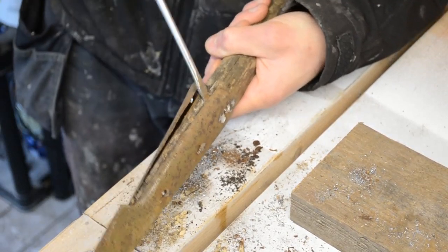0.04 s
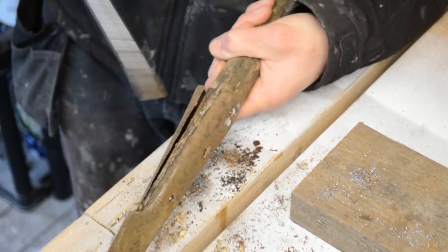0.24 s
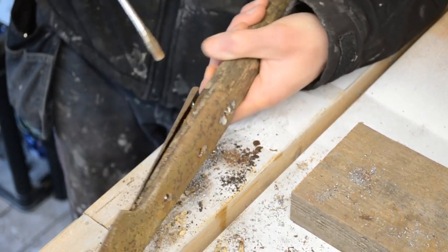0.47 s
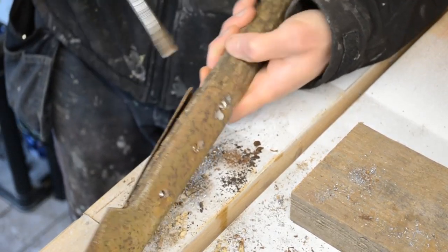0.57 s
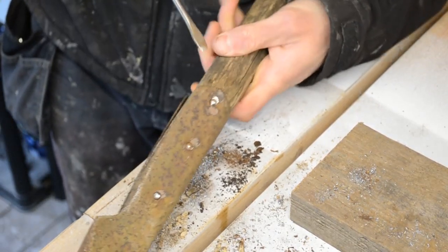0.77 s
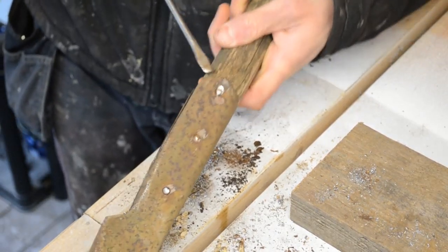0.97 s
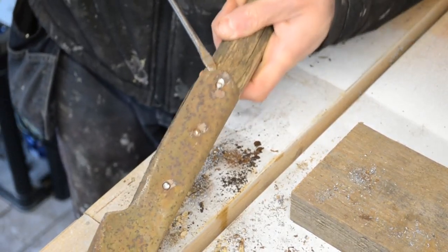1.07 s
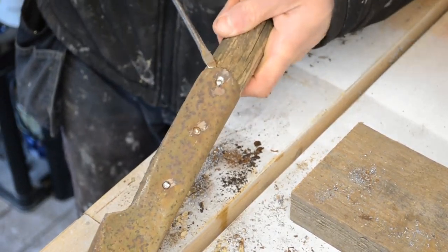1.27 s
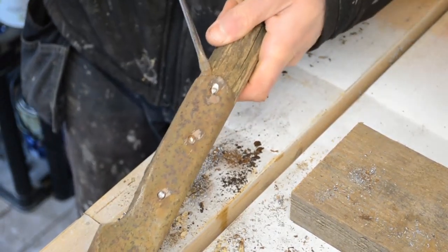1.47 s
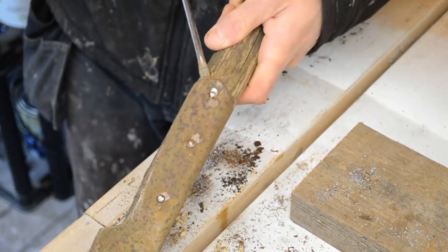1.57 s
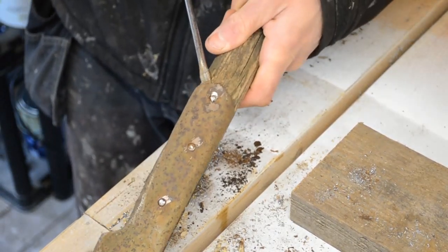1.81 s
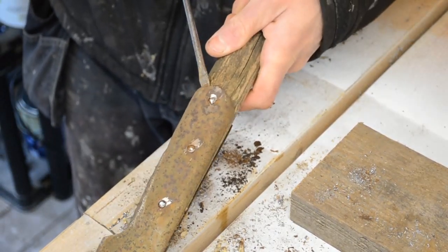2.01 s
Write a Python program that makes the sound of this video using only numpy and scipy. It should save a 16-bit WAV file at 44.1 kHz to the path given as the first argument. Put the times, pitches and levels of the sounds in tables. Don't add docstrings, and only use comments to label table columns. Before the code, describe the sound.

A loose wooden handle lands on a workbench with a quick cracking, hollow chatter, then a quieter, harder knock follows amid tool ticks, faint scrapes and sleeve rustle; close microphone in a small, quiet workshop.

```python
import sys
import numpy as np
from scipy import signal
from scipy.io import wavfile

SR = 44100
rng = np.random.default_rng(int(sys.argv[2]) if len(sys.argv) > 2 else 0)


def level_to_linear(level):
    exponent = np.asarray(level, float) / 20
    return 10 ** exponent


def generate_wav(sig):
    pcm = np.round(np.clip(np.atleast_2d(sig).T, -1, 1) * 32767).astype(np.int16)
    wavfile.write(sys.argv[1], SR, pcm)


N = 90404


def evened(x):
    return x / np.sqrt(np.mean(x ** 2) + 1e-20)


def add(mix, start_s, sound):
    part = mix[round(start_s * SR):][:len(sound)]
    part += sound[:len(part)]


def colour(x, points):
    f, db = np.transpose(points)
    grid_hz = abs(np.fft.fftfreq(4096, 1 / SR)) + 1
    gain_db = np.interp(np.log(grid_hz), np.log(f), db, left=db[0] - 25)
    log_gain = gain_db * np.log(10) / 20
    taps = np.fft.ifft(np.exp(np.conj(signal.hilbert(log_gain)))).real[:2048]
    return signal.oaconvolve(x, taps / np.linalg.norm(taps))[:len(x)]


def slow(top_hz):
    t = np.arange(N) / SR
    waves = [np.sin(2 * np.pi * (f * t + rng.random())) / np.sqrt(f) for f in np.geomspace(.5, top_hz, num=16)]
    return evened(sum(waves))


def ring(modes, damp, spread_db):
    t = np.arange(SR // 2) / SR
    detune = .015
    out = np.zeros(len(t))
    for hz, db, t60 in modes:
        level_luck, pitch_luck = rng.standard_normal(2)
        fall = level_to_linear(db + spread_db * level_luck - 60 * t / (t60 * damp))
        out += fall * np.sin(2 * np.pi * hz * (1 + detune * pitch_luck) * t)
    return out


def blows(rows, modes, damp, push_s, crack):
    rise_s, crack_t60, tail_t60, tail_db = .0008, 0.028, 0.14, -6.5
    soften_db = 8.5
    t = np.arange(SR // 4) / SR
    fall = level_to_linear(-60 * t / crack_t60) + level_to_linear(tail_db - 60 * t / tail_t60)
    fall *= np.minimum(t / rise_s, 1)
    hardest_db = max(row[1] for row in rows)
    rings, cracks = np.zeros(N), np.zeros(N)
    for s, push_db, crack_db in rows:
        half_push_s = push_s * (1 + (hardest_db - push_db) / soften_db)
        push = np.hanning(round(2 * half_push_s * SR) + 4.5)
        add(rings, s, level_to_linear(push_db) * np.convolve(ring(modes, damp, 1.5), push / push.sum()))
        add(cracks, s, level_to_linear(crack_db) * fall * rng.standard_normal(len(t)))
    return rings + colour(cracks, crack)


def chatter():
    # t/s, push level/dB, crack level/dB
    landings = [(.2035, -24, -30), (.2085, -20, -30.5), (.2140, -21, -34), (.2215, -22.5, -51),
                (.232, -22, -41), (.2375, -40, -28), (.251, -25, -40.5), (.266, -28, -36),
                (.279, -25.5, -37), (.294, -24.5, -41), (.302, -47, -77), (.316, -35.5, -50),
                (.336, -34.5, -60), (.354, -54, -75), (.379, -63, -77)]
    # f/Hz, level/dB, time to fall 60 dB/s
    bench = [(82, -10, 0.46), (153, -20.5, 0.067), (260, -11.5, 0.12), (403, -9.5, 0.12), (445.2, 2, 0.16),
             (522.3, 1.5, 0.16), (568.7, -1, 0.16), (591.7, -11, 0.21), (739, -15, 0.18), (762, -25, .2),
             (991, -26, 0.17), (1310, -32, .15), (1922, -32, 0.17), (2850, -32, .1)]
    # f/Hz, level per Hz/dB
    splinter = [(410, -33), (700, -0.5), (871, -6), (1330, -10), (1950, -15.5), (2520, -26), (4610, -34.5),
                (5170, -41), (15000, -55)]
    return blows(landings, bench, damp=0.75, push_s=0.00055, crack=splinter)


def knocks():
    # t/s, push level/dB, crack level/dB
    hits = [(.985, -37.5, -33.5), (.9875, -30, -35), (.9925, -32, -52), (1.0, -34.5, -39),
            (1.018, -35.5, -56), (1.035, -43.5, -66), (1.058, -44.5, -64), (1.085, -48, -63),
            (1.115, -48.5, -62)]
    # f/Hz, level/dB, time to fall 60 dB/s
    blade = [(122.8, -12.5, 0.48), (203, -39, 0.21), (244, -12, 0.18), (261, 2.5, 0.079), (376, -6, 0.083),
             (440, -5, 0.15), (605.3, -16, 0.52), (1200, -16.5, 0.088), (1444, -18, 0.1), (1830, -8, 0.048),
             (2205, -22, .1), (2554, -17, .1), (3440, -10, 0.087), (4300, -31, .08)]
    # f/Hz, level per Hz/dB
    knock_crack = [(700, -16.5), (1200, -4.5), (2250, 0.5), (2650, -9), (3000, -24), (3700, -12),
                   (4500, -17.5), (5200, -30), (15000, -53)]
    return blows(hits, blade, damp=0.68, push_s=0.00016, crack=knock_crack)


def ticks():
    # t/s, level/dB, shaft ring level/dB
    taps = [(0.176, -49, -43.5), (0.205, -49, -46), (0.238, -56, -47), (0.25, -46, -48), (0.268, -59, -56),
            (0.273, -62, -60), (.326, -77, -82), (0.5863, -46.5, -74.5), (0.713, -67, -70),
            (0.804, -62, -76), (1.3766, -62, -70), (1.445, -57, -77), (1.588, -52, -64)]
    # f/Hz, level/dB, time to fall 60 dB/s
    shaft = [(1700, 4, .012), (2400, 2, .01), (3700, -8, .006), (4580, -8, .022), (7850, -20, .006)]
    tick_t60, rattle_t60 = 0.0092, .15
    t = np.arange(4000) / SR
    band = signal.butter(1, [2000, 9000], "band", fs=SR)
    out = np.zeros(N)
    for s, db, ring_db in taps:
        hiss = signal.lfilter(*band, rng.standard_normal(len(t)))
        add(out, s, level_to_linear(db - 60 * t / tick_t60) * hiss)
        rattle = level_to_linear(-60 * t / rattle_t60) * rng.standard_normal(len(t))
        rattle /= np.linalg.norm(rattle)
        add(out, s, level_to_linear(ring_db) * signal.fftconvolve(ring(shaft, 1, 1), rattle))
    return out


def scrapes():
    # t/s, level/dB, f/Hz, length/s
    strokes = [
        (.58, -58, 1010, 0.038),
        (0.806, -54.5, 1520, 0.049),
        (1.349, -57, 1300, 0.066),
        (1.469, -60.5, 1200, 0.09),
        (1.881, -59, 1450, 0.033),
    ]
    width = 0.066
    out = np.zeros(N)
    for s, db, hz, length in strokes:
        band = signal.butter(1, [hz * (1 - width), hz * (1 + width)], "band", fs=SR)
        rub = evened(signal.lfilter(*band, rng.standard_normal(8000)))
        u = np.arange(0, length, 1 / SR) / length
        add(out, s, level_to_linear(db) * np.sin(np.pi * u) * rub[:len(u)])
    return out


def thumps():
    # t/s, level/dB, f/Hz, length/s
    bumps = [(0.467, -50.5, 76, .04), (.645, -45.5, 117, 0.018), (0.657, -42, 95, 0.041),
             (0.698, -54, 81, 0.033), (0.761, -52.5, 70, 0.027), (.3, -34, 82, 0.047),
             (0.394, -50, 102, 0.035), (0.577, -57.5, 351.3, 0.053), (1.031, -44.5, 122, .06),
             (1.1, -55, 89, 0.036), (1.581, -50, 284, 0.032), (1.61, -50.5, 127, 0.056)]
    roughness = .55
    out = np.zeros(N)
    for s, db, hz, length in bumps:
        band = signal.butter(2, [0.45 * hz, 1.75 * hz], "band", fs=SR)
        noise = signal.lfilter(*band, rng.standard_normal(9000))[1000:]
        whole_s = 1.3 * length
        u = np.arange(0, whole_s, 1 / SR) / whole_s
        tone = np.sin(2 * np.pi * np.cumsum(hz * (1.1 - 0.22 * u)) / SR)
        body = tone + roughness * evened(noise)[:len(u)]
        add(out, s, level_to_linear(db) * np.sin(np.pi * u ** .7) ** 1.3 * body)
    return out


def rustle():
    # t/s, level/dB
    motion = [(0, -61.5), (.3, -67), (.47, -61), (0.602, -53.5), (.65, -56), (.74, -53), (.84, -57.5),
              (.89, -57.5), (1.06, -52), (1.13, -59), (1.25, -67), (1.33, -60.5), (1.38, -55.5),
              (1.58, -55), (1.73, -61), (1.88, -56.5), (1.97, -63.5), (2.05, -69)]
    # f/Hz, level per Hz/dB
    cloth = [(150, -10.5), (300, -4), (600, -5.5), (1400, -4.5), (2600, -11.5), (5000, -24.5),
             (11000, -32.5), (14800, -38)]
    grains_per_s, grain_db = 1300, -9
    grain_size = level_to_linear(3.7 * np.minimum(rng.exponential(1, N), 5))
    grain_here = rng.random(N) < grains_per_s / SR
    grains = grain_size * grain_here * rng.choice([-1, 1], N)
    hiss = rng.standard_normal(N) * level_to_linear(0.43 * slow(30))
    s, db = np.transpose(motion)
    swell = level_to_linear(np.interp(np.arange(N) / SR, s, db))
    return swell * colour(hiss + level_to_linear(grain_db) * evened(grains), cloth)


def room(x):
    room_t60, room_db = 0.26, -9.5
    at = np.arange(200, SR // 2, 22)
    taps = np.zeros(SR // 2 + 22)
    fall = level_to_linear(-60 * at / SR / room_t60)
    taps[at + rng.integers(0, 22, len(at))] = rng.choice([-1., 1.], len(at)) * fall
    taps = signal.lfilter([1], [1, -.3], taps)
    return level_to_linear(room_db) * signal.fftconvolve(x, taps / np.linalg.norm(taps))[:N]


def hush():
    # f/Hz, level per Hz/dB
    air = [(25, -6.5), (75, 0.5), (150, -10.5), (400, -10.5), (1150, -9.5), (2500, -21), (6000, -38),
           (14800, -41.5)]
    return level_to_linear(-56.5 + .7 * slow(2.9)) * colour(rng.standard_normal(N), air)


def whine():
    # f/Hz, rms level/dB
    tones = [(15665, -78.5)]
    t = np.arange(N) / SR
    return sum(np.sqrt(2) * level_to_linear(db + 1. * slow(27)) * np.sin(2 * np.pi * hz * t) for hz, db in tones)


def treble_dropouts(x):
    # t/s, length/s, kept below f/Hz
    dropouts = [
        (0.892, 0.028, 4430),
        (1.018, .012, 4700),
        (1.146, 0.011, 4000),
        (1.225, 0.018, 4400),
        (1.895, 0.0084, 4260),
        (2.018, 0.019, 4000),
    ]
    drop_db, survive, fade_s = -20, .14, 0.0025
    hz, t, z = signal.stft(x, SR, nperseg=512, noverlap=448)
    gain = np.ones(z.shape)
    for s, length, edge_hz in dropouts:
        lost = (hz > edge_hz) & (hz < 15400) & (rng.random(len(hz)) > survive * (hz < 8000))
        depth = np.clip(np.minimum(t - s, s + length - t) / fade_s + 1, 0, 1)
        gain *= level_to_linear(drop_db * np.outer(lost, depth))
    return signal.istft(z * gain, SR, nperseg=512, noverlap=448)[1][:N]


def scene():
    hits = chatter() + knocks() + ticks()
    hits = signal.lfilter(*signal.butter(2, 70, "high", fs=SR), hits)
    return (hits + room(hits) + scrapes() + thumps() + rustle() + hush())[None]


def roll_off(x):
    return signal.sosfilt(signal.butter(12, 15960, fs=SR, output="sos"), x)


def record(dry):
    top = signal.cheby2(10, 50, 15500 + 600, fs=SR, output="sos")
    limited = signal.sosfilt(top, dry[0])
    mix = treble_dropouts(limited + whine())[None] + .0006
    return roll_off(mix)


dry = scene()
out = record(dry)
generate_wav(out)
```